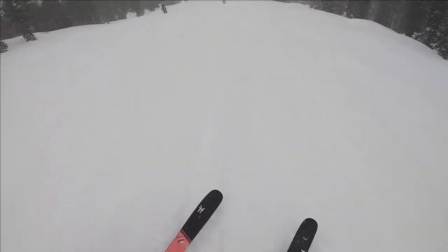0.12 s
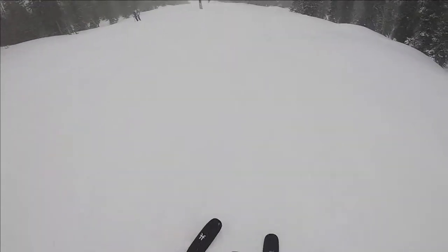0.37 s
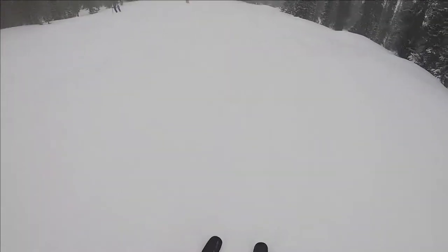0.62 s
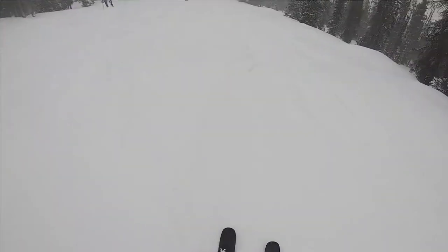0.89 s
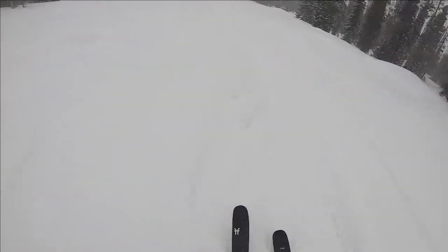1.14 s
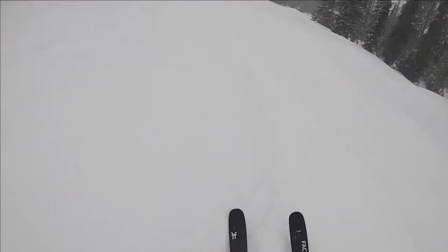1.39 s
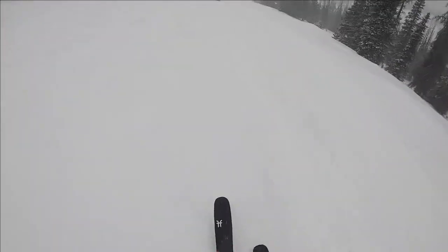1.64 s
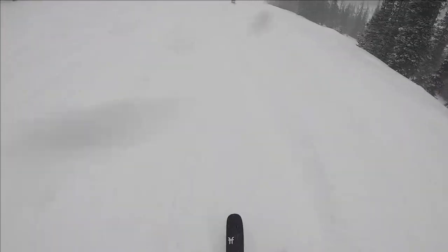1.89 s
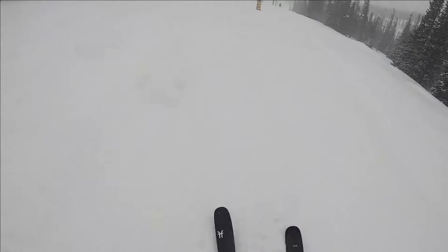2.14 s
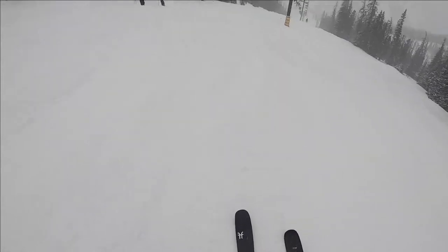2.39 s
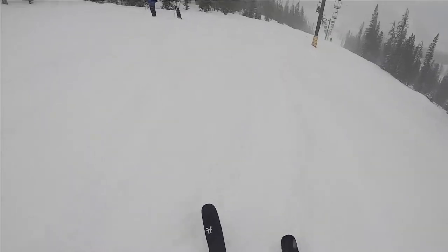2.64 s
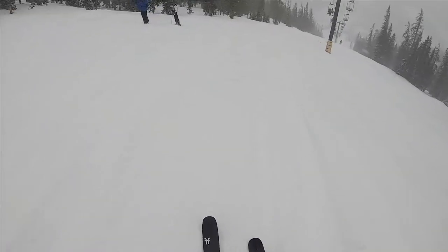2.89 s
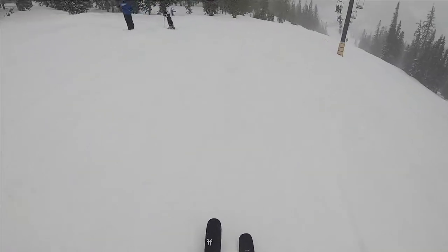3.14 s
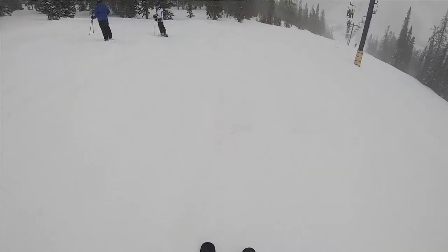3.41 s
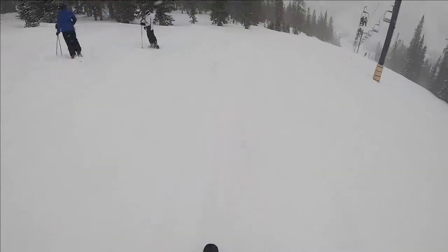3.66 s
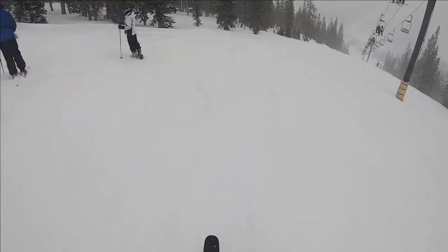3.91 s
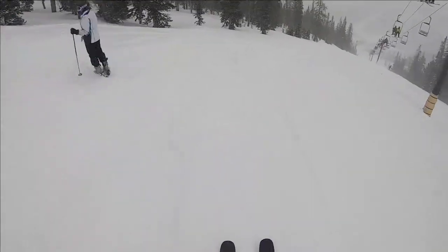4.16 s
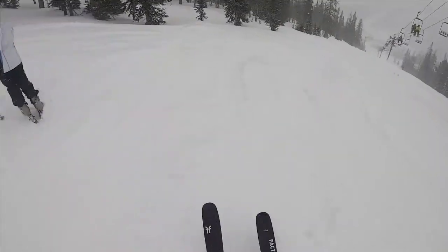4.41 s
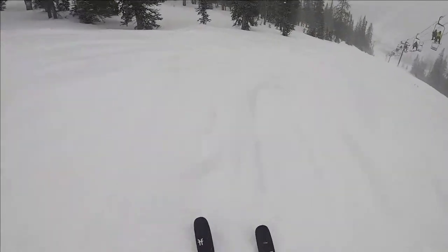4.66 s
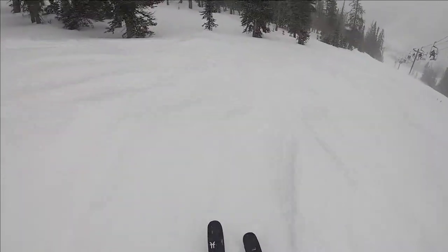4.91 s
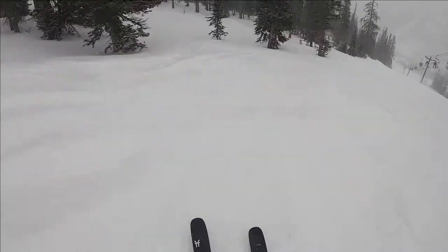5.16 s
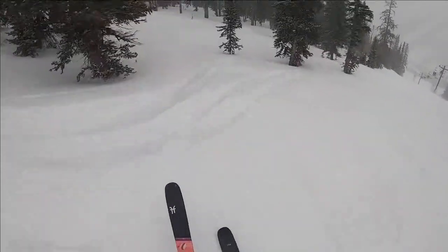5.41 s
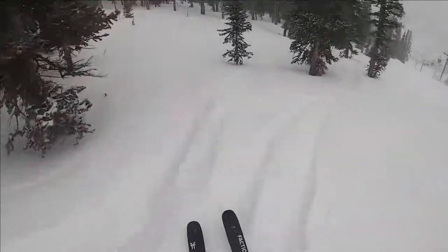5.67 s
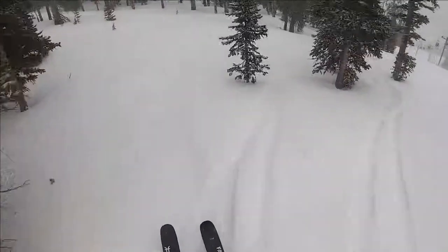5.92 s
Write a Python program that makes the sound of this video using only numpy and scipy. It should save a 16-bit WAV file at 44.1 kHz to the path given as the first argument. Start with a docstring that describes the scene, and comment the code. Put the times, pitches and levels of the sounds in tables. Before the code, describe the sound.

Heavy wind rumbles and buffets a microphone during a fast downhill ski run, with skis hissing over snow and scattered pops, ticks and clacks.

```python
"""A lumpy low rumble, wind rush, howl and ski hiss sound together throughout, with pops and ticks among them:
a small microphone rides downhill above a pair of skis in falling snow.
Shaped noise of fluctuating strength makes the eddies, the air stream past the housing and the snow.
Widening swings make the pressure pops, short noise grains the ticking crystals, decaying modes the gear
clacks, a falling tone the strap's squeak; near the end a side gust flutters and a thin swish rises."""
import sys
import numpy as np
from scipy import signal
from scipy.fft import rfft, irfft, next_fast_len
from scipy.io import wavfile
from scipy.ndimage import uniform_filter1d

SR = 44100
rng = np.random.default_rng(int(sys.argv[2]) if len(sys.argv) > 2 else 0)


def waveform_to_disk(signal):
    """Save audio, clipped to [-1, 1], as 16-bit WAV at the path in sys.argv[1]."""
    frames = np.transpose(np.atleast_2d(signal))
    scaled = np.clip(frames, -1, 1) * 32767
    samples = np.round(scaled).astype(np.int16)
    wavfile.write(sys.argv[1], SR, samples)


def makeup_ratio(level_db):
    """Linear amplitude ratio for a level in decibels (20 dB per factor of ten)."""
    decades = np.asarray(level_db, float) / 20
    return 10 ** decades


N = 266492

# Eddies on the port. Each row: time in seconds, strength in dB, extra depth of the thump in dB.
EDDY_STRENGTH = [(0.0, -15.5, -12), (0.1, -14.5, 2), (0.15, -11, 8), (0.18, -18.5, -3), (0.69, -9, -7.5),
                 (1.01, -14.5, -12), (1.16, -21, -0.5), (1.18, -9, -9), (1.29, -14.5, -6.5),
                 (1.85, -17.5, -3), (1.92, -15, -11.5), (2.62, -11, 0), (2.84, -22, -10.5), (2.88, -14, 2),
                 (2.96, -13.5, -14), (3.08, -13.5, -4), (3.23, -19.5, -7.5), (3.31, -13.5, -8),
                 (3.95, -14, -3), (4.0, -11, -8), (4.14, -11, -2.5), (4.27, -23.5, -3), (4.31, -13.5, -3.5),
                 (5.0, -20.5, -5.5), (5.03, -11, -9.5), (5.4, -20, 6), (5.5, -13, -17), (5.75, -19.5, -11),
                 (5.79, -2.5, -2), (5.96, -28, -1), (6.01, -5.5, -24), (6.04, -21, 1)]
# Noise spectra of the eddies. Each row: frequency in Hz, relative spectral density in dB.
THUMP_SPECTRUM = [(16, 1.5), (25, -7.5), (45, 1.5), (62, -8.5), (90, -9.5), (150, -61)]
RUMBLE_SPECTRUM = [(40, -11), (62, -3.5), (80, -2), (125, -3.5), (170, -10.5), (250, -20.5), (400, -39),
                   (800, -69)]
# Air stream past the housing. Each row: time in seconds, strength in dB,
# how squarely it meets the howling edge in dB.
AIR_STREAM = [(0.0, -32, -0.5), (0.1, -25.5, -13), (0.16, -32, -16), (0.19, -41, -28), (0.38, -32, -15),
              (0.47, -35, 0), (0.54, -30, 2.5), (0.62, -27.5, -3), (0.73, -23.5, -2.5), (0.85, -26.5, -3.5),
              (0.94, -30.5, 4), (1.02, -25, 1), (1.14, -34.5, 3), (1.25, -25, 3.5), (1.42, -30, -5),
              (1.57, -29.5, 3), (1.68, -30.5, -2), (1.8, -30, 1.5), (2.03, -26.5, -2), (2.1, -19.5, -5),
              (2.2, -30.5, 1.5), (2.44, -25.5, -4), (2.83, -36.5, -10), (2.9, -30, -1), (3.0, -34, -10),
              (3.08, -40, -53), (3.44, -34, -6), (3.52, -31, -1), (3.94, -32, -8.5), (4.15, -28.5, 4),
              (4.19, -34, -2), (4.3, -34, -1), (4.42, -32.5, -2.5), (4.52, -31.5, 0.5), (4.63, -30, 1.5),
              (4.76, -31, -2), (4.95, -29, -4.5), (5.1, -29, -13), (5.15, -30, -22), (5.4, -31, -16),
              (5.48, -30, -19), (5.5, -27, -27), (5.58, -38, -30), (5.595, -25, -10), (5.61, -23, -35),
              (5.72, -27.5, 2), (5.81, -24, -3), (5.89, -21.5, -8), (5.95, -26.5, -15), (6.04, -23.5, -22)]
# Noise spectrum of the rushing air. Each row: frequency in Hz, relative spectral density in dB.
RUSH_SPECTRUM = [(120, -13), (200, 3), (300, -2), (450, -6), (700, -7.5), (1000, -11), (1600, -18.5),
                 (2400, -29.5), (4000, -38)]
# Pitch of the howl as the head turns. Each row: time in seconds, frequency in Hz.
HOWL_PITCH_HZ = [(0, 1059), (0.5, 1325), (0.7, 1245), (0.95, 1216), (1.3, 1428), (1.55, 1314), (1.65, 1453),
                 (1.8, 1223), (2.1, 1356), (2.4, 1212), (2.7, 1333), (3.6, 1077), (4.0, 1197),
                 (4.14, 979.7), (4.4, 1067), (4.7, 1198), (5.2, 1065), (5.47, 1210), (5.8, 1022)]
# Skis on the snow. Each row: time in seconds, pressure as scrape level in dB,
# fineness of the snow thrown up in dB.
SKI_PRESSURE = [(0.0, -43, -7), (0.34, -47.5, 3.5), (0.67, -32.5, -12.5), (1.01, -36.5, -11),
                (1.06, -32, -1.5), (1.18, -37.5, -2.5), (1.35, -34.5, -7.5), (1.63, -41.5, -1),
                (1.95, -37.5, -4), (2.15, -34, -6), (2.25, -39.5, -14), (2.47, -36, -3.5),
                (2.71, -41.5, -0.5), (2.84, -44, -4), (3.04, -45, 0), (3.08, -53, 1.5), (3.26, -50.5, 5.5),
                (3.53, -35, -8), (3.57, -42, -8.5), (3.85, -42, 0), (4.09, -35, -2.5), (4.41, -43.5, -2.5),
                (4.55, -35, -7.5), (4.67, -38, -6), (4.8, -41.5, -8.5), (5.0, -40, -6), (5.23, -43.5, -4),
                (5.47, -35, -12), (5.62, -41.5, -5), (5.68, -30, -8.5), (6.04, -47, -2)]
# Noise spectra of the snow. Each row: frequency in Hz, relative spectral density in dB.
SCRAPE_SPECTRUM = [(900, -34), (1500, 4), (2000, 6), (3100, 3), (3700, -12), (5000, -51)]
HISS_SPECTRUM = [(2200, -20), (3300, 3), (4000, 1.5), (5000, -3), (5800, -17.5), (8000, -41)]
SPRAY_SPECTRUM = [(4000, -3), (5600, -1), (7500, -1.5), (9800, -8.5), (11500, -17), (14000, -40),
                  (16000, -65)]
# Puffs of powder past the microphone, and gaps in it.
# Each row: middle in seconds, length in seconds, level change in dB.
POWDER_PUFFS = [(0.01, 0.19, 6.5), (0.34, 0.16, 4.5), (0.56, 0.17, 4), (1.257, 0.29, 6), (1.687, 0.36, 4.5),
                (2.078, 0.44, 7.5), (2.275, 0.16, 5.5), (2.4, 0.08, 3.5), (2.56, 0.11, 1),
                (2.824, 0.17, -5), (2.92, 0.13, 7), (3.433, 0.22, 2), (3.74, 0.069, 4), (4.43, 0.099, -5),
                (5.792, 0.036, 5), (5.788, 0.99, -5)]
# Pressure steps on the membrane. Each row: deepest point in seconds, strength in dB, time scale in ms
# (the first swing lasts 1.1 times that).
PRESSURE_POPS = [(0.0163, -17, 0.42), (0.1698, -13, 0.84), (0.4077, -11.5, 0.11), (0.564, -9, 0.27),
                 (0.6554, -12.5, 0.28), (0.7194, -13, 0.21), (0.7285, -7, 0.2), (0.967, -10.5, 0.3),
                 (1.2608, -6.5, 0.19), (1.3882, 2, 0.19), (1.978, -10, 0.23), (2.0671, -8.5, 0.28),
                 (2.0842, -10, 0.17), (2.3493, -10.5, 0.19), (2.3524, -12, 0.16), (2.6154, -14, 0.18),
                 (2.688, -6, 1.47), (2.7774, -11.5, 0.19), (2.9554, -14, 0.35), (2.9835, -17, 0.24),
                 (3.041, -13, 0.68), (3.113, -15, 1.03), (3.201, -18.5, 0.46), (3.239, -20, 0.5),
                 (3.3187, -9.5, 0.33), (3.4196, -4.5, 0.36), (3.445, -21, 0.3), (3.695, -15, 0.4),
                 (3.811, -22, 0.19), (3.8856, -10.5, 0.25), (3.9705, -0.5, 0.36), (4.07, -12.5, 0.5),
                 (4.7152, -13.5, 0.41), (4.8375, -16, 0.22), (5.041, -6, 2.5), (5.090, -7, 1.16),
                 (5.499, -6.5, 0.93), (5.5249, -10, 0.76), (5.562, -6, 1.9), (5.6058, -5.5, 0.48),
                 (5.611, -3, 0.62), (5.645, -4.5, 0.65), (5.666, -2.5, 0.61), (5.7835, -21, 0.5),
                 (5.887, -3.5, 0.48), (5.910, -10, 0.7), (6.005, -6, 0.6)]
# Small eddies popping at random. Each row: start in seconds, end in seconds,
# greatest strength over the buffet's in dB, shortest time scale in ms.
RIPPLE_SPANS = [(0, 6.04, -7.5, 0.49), (5.601, 6.04, -4.5, 0.3)]
# Each entry: number of small eddies in the span of the same place.
RIPPLE_NUMBERS = [110, 30]
# Loudest crystals on the case. Each row: time in seconds, strength in dB,
# dullness in dB (above 0 a bigger, lower grain).
LOUD_CRYSTALS = [(0.0567, -28, -6), (0.1444, -49.5, 13), (0.2483, -46, 3), (0.3047, -41, -4),
                 (0.318, -44, 6.5), (0.3614, -43, 2), (0.56, -39, -18), (0.617, -37, -18),
                 (0.801, -32, -13), (0.837, -34, -8), (0.959, -37, -15), (1.228, -22.5, -3.5),
                 (1.3076, -24, -3.5), (1.353, -30, 4.5), (1.449, -27.5, -11), (2.019, -40, 3),
                 (2.1194, -29, -5), (2.187, -32.5, 8), (2.3191, -40, 6), (2.4823, -39, -3),
                 (3.037, -38, 6.5), (3.1836, -41, -16), (3.2064, -26.5, -3), (3.485, -37, 0),
                 (3.527, -42, 6.5), (3.606, -38, 3.5), (3.654, -28.5, 0), (4.009, -38, 4.5),
                 (4.171, -47, 14), (4.352, -33.5, 4.5), (4.599, -36, -10), (4.7256, -47.5, 12),
                 (4.792, -31.5, -9), (4.89, -37, 3), (4.9425, -31.5, 4), (5.027, -39, -16),
                 (5.091, -30, -13), (5.2641, -31, 4.5), (5.3342, -27, -4.5), (5.744, -48, -10),
                 (5.7753, -39, -2), (5.8626, -36.5, 3)]
# Bands of a crystal's tick. Each row: low edge in Hz, high edge in Hz, sensitivity of the port in dB,
# share of the dullness.
CRYSTAL_BANDS = [(5700, 8000, -4.5, -0.39), (3300, 5400, 7, 1.46), (9400, 10430, -22, -1.25),
                 (11100, 13500, -33, -1.3)]
# Gear clacks. Each row: start in seconds, ring level in dB, ring frequency in Hz, crack peak in dB,
# cycles in which the ring dies by 60 dB.
GEAR_CLACKS = [(0.1083, -15, 1340, -38, 22), (0.4066, -4, 1670, -16, 8), (1.305, -20, 1520, -29, 30),
               (1.351, -14, 1300, -19, 37), (1.439, -28, 1187, -18, 30), (1.81, -21, 1210, -46, 32),
               (1.893, -16, 1273, -48, 40), (2.1832, -11, 1440, -17, 30), (2.4, -10, 1100, -23, 25),
               (2.4183, -12, 1170, -20, 27), (2.5302, -22.5, 1976, -43, 50), (2.681, -19.5, 1434, -22, 25),
               (3.039, -22.5, 1710, -19, 30), (3.21, -16, 1590, -28, 22), (3.8075, -17, 960, -36, 25),
               (3.884, -9.5, 2040, -34, 19), (3.887, -19, 900, -43, 22), (4.088, -16, 1250, -35, 28),
               (4.219, -17, 1170, -42, 35), (4.354, -22, 1460, -19, 32), (4.665, -10.5, 1013, -24, 28),
               (4.937, -18, 857, -25.5, 25), (4.98, -21, 996, -40, 32), (5.265, -23, 808, -19.5, 30),
               (5.521, -24, 690, -26, 30), (5.555, -25, 1670, -45, 40), (5.785, -11, 1540, -24, 31),
               (5.795, -11, 1370, -22, 26), (5.9525, -14.5, 1724, -26, 22), (5.998, -20, 1576, -40, 30),
               (6.015, -11, 1383, -30, 30)]
# Noise spectra of the side gust. Each row: frequency in Hz, relative spectral density in dB.
FLUTTER_SPECTRUM = [(70, -18), (110, 0.5), (180, -2), (300, -6), (480, -16.5), (800, -29)]
GRIT_SPECTRUM = [(300, -17), (500, 3.5), (900, -5), (1500, -11), (2300, -16), (3500, -43)]

# the side gust strikes twice, rising alike each time
SIDE_GUST_S, SIDE_SECOND_S, SIDE_RISE_S = 5.49, 5.6, 0.009


def rms_one(x):
    """Normalisation: a signal divided by its root mean square has unit power."""
    return x / np.sqrt(np.mean(x ** 2) + 1e-20)


def in_time(rows):
    """Linear interpolation: each column of a time table becomes one value per sample."""
    s, *columns = np.transpose(rows)
    return [np.interp(np.arange(N) / SR, s, c) for c in columns]


def drift(rate_hz):
    """Low-pass filtering: noise through two equal one-pole filters wanders slowly with unit rms."""
    step = 20   # samples between computed points
    r = np.exp(-2 * np.pi * rate_hz * step / SR)
    noise = rng.standard_normal(N // step + 2002)
    slow = signal.lfilter([1], [1, -2 * r, r * r], noise)[2000:]   # the filter has settled
    return np.interp(np.arange(N) / step, np.arange(len(slow)), rms_one(slow))


def coloured(spectrum, x):
    """Spectral shaping: the Fourier components are weighted by a curve over log frequency; rms 1."""
    size = next_fast_len(N)
    hz, db = np.transpose(spectrum)
    log_hz = np.log(np.arange(1, size // 2 + 2) * SR / size)
    weight = makeup_ratio(np.interp(log_hz, np.log(hz), db, left=-99, right=-99))
    return rms_one(irfft(rfft(x, size) * weight, size)[:N])


def turbulence(flicker_db, flicker_hz, grit_db):
    """Intermittency: white noise whose strength flickers slowly with eddies and fast from grain to grain."""
    return rng.standard_normal(N) * makeup_ratio(flicker_db * drift(flicker_hz) + grit_db * drift(234))


def evened(x, span_s, share):
    """Regular succession of eddies: part of the random swell is divided out; rms 1."""
    swell = np.sqrt(uniform_filter1d(x ** 2, round(span_s * SR)) + 1e-3)
    return rms_one(x / swell ** share)


def add(out, s, burst):
    """Superposition: a short burst adds to the sound from time s on."""
    at = round(s * SR)
    out[at:at + len(burst)] += burst[:N - at]


def band_bursts(grains, low_hz, high_hz, order=2):
    """Band-pass filtering: rows of decaying noise keep one band, each scaled to peak 1."""
    band = signal.butter(order, [low_hz, high_hz], "band", fs=SR, output="sos")
    bursts = signal.sosfilt(band, grains)
    return bursts / np.abs(bursts).max(axis=1, keepdims=True)


def crunch(per_s, size_db, fade_s):
    """Impulsive excitation: clods and sharp eddies jolt the level at random; it relaxes exponentially, in dB."""
    jumps = (rng.random(N) < per_s / SR) * np.minimum(rng.exponential(1, N), 2.5)
    return size_db * signal.lfilter([1], [1, -np.exp(-1 / (fade_s * SR))], jumps)


def puffs():
    """Smooth modulation: each puff or gap swells and fades as a squared cosine, in dB."""
    t = np.arange(N) / SR
    return sum(db * np.cos(np.pi * np.clip((t - s) / length, -0.5, 0.5)) ** 2
               for s, length, db in POWDER_PUFFS)


def buffeting(rumble):
    """Turbulent pressure: large eddies thump and smaller ones rumble at the port, taking turns."""
    eddy_db, deep_db = in_time(EDDY_STRENGTH)
    swap_db = 4 * drift(12)
    lump_db = 1.1 * drift(6.9)   # single buffets stand out
    # the side gust breaks up the largest eddies
    broken_db = -15 * np.clip((np.arange(N) / SR - SIDE_GUST_S) / SIDE_RISE_S, 0, 1)
    thump = evened(coloured(THUMP_SPECTRUM, rng.standard_normal(N)), span_s=0.42, share=0.27)
    thump = makeup_ratio(broken_db + deep_db + swap_db) * thump
    rumble = makeup_ratio(-3.5 - 0.28 * deep_db - 0.43 * swap_db) * rumble
    return makeup_ratio(eddy_db + lump_db) * (thump + rumble)


def howl(centre_hz, width_hz, gust):
    """Edge tone: low-passed noise on a quadrature carrier is a narrow band at a moving, wavering pitch."""
    low_pass = signal.butter(2, width_hz / 2, fs=SR, output="sos")
    slow = [signal.sosfilt(low_pass, turbulence(0.29, 30, 3.1) * gust) for side in range(2)]
    wander = 0.05 * drift(12)   # share of the pitch
    phase = 2 * np.pi * np.cumsum(centre_hz * (1 + wander)) / SR
    return rms_one(slow[0] * np.cos(phase) + slow[1] * np.sin(phase))


def air_stream(gust_db, rumble):
    """Flow noise: the stream rushes past the housing, stronger in each rumble swing, and howls at its edge."""
    air_db, edge_db = in_time(AIR_STREAM)
    howl_hz, = in_time(HOWL_PITCH_HZ)
    swing = 1.2 + uniform_filter1d(np.abs(rumble), size=600)
    rush = coloured(RUSH_SPECTRUM, turbulence(1.37, 28, 3.3) * makeup_ratio(1.2 * gust_db) * swing)
    edge_howl = howl(howl_hz, width_hz=420, gust=makeup_ratio(2.0 * gust_db))
    return makeup_ratio(air_db) * (makeup_ratio(1.5) * rush + makeup_ratio(-1.5 + edge_db) * edge_howl)


def skis_on_snow(gust_db):
    """Friction noise: pressed snow scrapes and hisses, and fine spray adds the highest band."""
    scrape_db, fine_db = in_time(SKI_PRESSURE)
    puff_db = puffs()
    scrape = coloured(SCRAPE_SPECTRUM, turbulence(1.97, 27, 1.8) * makeup_ratio(1.6 * gust_db))
    hiss = coloured(HISS_SPECTRUM, turbulence(2.06, 19, 0.75) * makeup_ratio(1.1 * gust_db))
    spray = coloured(SPRAY_SPECTRUM, turbulence(0.57, 35, 1.34) * makeup_ratio(2.2 * gust_db))
    # the spray follows only a share of the pressure's swing about -41 dB
    spray_db = -53 + 0.29 * (scrape_db + 41) + 0.044 * fine_db + puff_db
    lower_snow = makeup_ratio(0.88 * puff_db) * scrape + makeup_ratio(fine_db + 0.6 * puff_db) * hiss
    return makeup_ratio(scrape_db) * lower_snow + makeup_ratio(spray_db) * spray


def wind_and_skis():
    """Common modulation: the same quick gusts shake the air stream and the snow over the eddies."""
    gust_db = 0.3 * drift(29) + crunch(per_s=40, size_db=1.1, fade_s=0.016)
    rumble = evened(coloured(RUMBLE_SPECTRUM, rng.standard_normal(N)), span_s=0.3, share=0.28)
    return buffeting(rumble) + air_stream(gust_db, rumble) + skis_on_snow(gust_db)


def random_pops():
    """Random arrivals: eddies sweep by at chance moments with chance strengths and time scales."""
    eddy_db, deep_db = in_time(EDDY_STRENGTH)
    sweeps = []
    for a, b, c in rng.random((70, 3)):   # large eddies, slow
        sweeps.append((a * N / SR, eddy_db[int(a * N)] + 5 - 7.5 * b, 1.48 * (1 + 2.06 * c)))
    for (start, end, db, shortest_ms), count in zip(RIPPLE_SPANS, RIPPLE_NUMBERS):
        for a, b, c in rng.random((count, 3)):
            s = min(start + a * (end - start), (N - 1) / SR)
            sweeps.append((s, eddy_db[int(s * SR)] + db - 9.3 * b, shortest_ms * (1 + 2.07 * c)))
    return sweeps


def pops():
    """Step response: after a pressure step the membrane swings to and fro, each swing 2.1 times longer."""
    out, ms = np.zeros(N), np.arange(4000) * 1000 / SR
    port = signal.butter(8, 2450, fs=SR, output="sos")   # the port rounds the step
    for s, db, swing_ms in list(PRESSURE_POPS) + random_pops():
        swings = np.log(1 + ms / swing_ms) / np.log(2.1)
        size = np.where(swings < 1, 0.97, 1) * np.exp(-(swings / 3.23) ** 4)   # first swing held back slightly
        # a slower pop has a duller edge
        soft = signal.butter(2, min(0.53 * 1000 / swing_ms, 9000), fs=SR, output="sos")
        step = makeup_ratio(db) * np.sin(np.pi * swings) * size + 1e-18
        pop = signal.sosfilt(np.vstack([soft, port]), step)
        add(out, max(s - pop.argmin() / SR, 0), pop)   # s marks the deepest point
    return out


def crystals(per_s, faint_db):
    """Impact noise: each crystal is a millisecond of bright noise; faint ones arrive at random."""
    faint = [(a * N / SR, faint_db - 12 * b, 3 - 24 * c) for a, b, c in rng.random((round(per_s * N / SR), 3))]
    rows = np.array(list(LOUD_CRYSTALS) + faint)
    out, t = np.zeros(N), np.arange(200) / SR
    grains = rng.standard_normal((len(rows), len(t))) * t * np.exp(-t / 0.0004)
    own_db = 3.77 * rng.standard_normal((len(rows), len(CRYSTAL_BANDS)))   # no two sound alike
    ticks = np.zeros(grains.shape)
    for k, (low_hz, high_hz, db, share) in enumerate(CRYSTAL_BANDS):
        level_db = rows[:, [1]] + db + share * rows[:, [2]] + own_db[:, [k]]
        ticks += makeup_ratio(level_db) * band_bursts(grains, low_hz, high_hz)
    for s, tick in zip(rows[:, 0], ticks):
        add(out, s, tick)
    return out


def squeak():
    """Stick-slip: a strap slips twice, its tone falling quickly to a steady pitch."""
    start_s, length_s = 0.1075, 0.018
    first_hz, settled_hz, settle_s = 1390, 900, 0.0015
    out, t = np.zeros(N), np.arange(round(length_s * SR)) / SR
    hz = settled_hz + (first_hz - settled_hz) * np.exp(-t / settle_s)
    part = t / length_s
    dip_db = -11 * np.exp(-((part - 0.45) / 0.097) ** 2)   # between the two slips
    level = np.sin(np.pi * part) ** 0.3 * makeup_ratio(-14 - 4.9 * part + dip_db)
    add(out, start_s, level * np.sin(2 * np.pi * np.cumsum(hz) / SR))
    return out


def clacks():
    """Modal ringing: knocked buckles and poles ring in two damped modes with a band of cracking noise."""
    out, t = np.zeros(N), np.arange(2000) / SR
    # a longer ring comes with a longer crack
    crack_s = np.array([[1.8 * cycles / hz] for s, db, hz, crack_db, cycles in GEAR_CLACKS])
    noise = rng.standard_normal((len(GEAR_CLACKS), len(t))) * makeup_ratio(-60 * t / crack_s)
    cracks = band_bursts(noise, 1350, 3720, order=4)
    for (s, db, hz, crack_db, cycles), crack in zip(GEAR_CLACKS, cracks):
        upper = 0.7 * np.sin(2 * np.pi * 1.433 * hz * t) * makeup_ratio(-60 * t / 0.025)
        ring = (np.sin(2 * np.pi * hz * t) + upper) * np.minimum(t / 0.001, 1)
        add(out, s, makeup_ratio(db - 60 * t * hz / cycles) * ring + makeup_ratio(crack_db) * crack)
    return out


def side_gust():
    """Turbulent onset: fast small eddies set in abruptly, twice, and flutter at the port in uneven lumps."""
    t = np.arange(N) / SR - SIDE_GUST_S
    second_s = SIDE_SECOND_S - SIDE_GUST_S
    lull_db = np.interp(t, [0.04, second_s, second_s + SIDE_RISE_S], [0, -12, 0])
    level = np.clip(t / SIDE_RISE_S, 0, 1) * makeup_ratio(-14 - 12.5 * t + lull_db)   # sags by 12.5 dB per s
    second = np.clip((t - second_s) / SIDE_RISE_S, 0, 1)
    flutter = coloured(FLUTTER_SPECTRUM, turbulence(4.1, 19.5, 1.48))
    grit = makeup_ratio(-12) * second * coloured(GRIT_SPECTRUM, turbulence(2.5, 45, 3.0))
    return level * (flutter + grit)


def swish():
    """Gliding resonance: a narrow band of air noise climbs in pitch past the housing, swells and fades."""
    start_s, length_s, from_hz, to_hz = 5.62, 0.15, 2200, 4400
    part = np.clip((np.arange(N) / SR - start_s) / length_s, 0, 1)
    centre_hz = from_hz + (to_hz - from_hz) * part
    return makeup_ratio(-37.5) * np.sin(np.pi * part) * howl(centre_hz, width_hz=600, gust=1)


def scene():
    """Superposition: all sources add at one microphone in open air."""
    mix = wind_and_skis() + pops() + crystals(per_s=25, faint_db=-40.0) + squeak() + clacks()
    mix = mix + side_gust() + swish()
    return mix[None]


def top_cut(x):
    """Nothing passes above the cut-off."""
    return signal.sosfilt(signal.butter(12, 15600, fs=SR, output="sos"), x)


def record(dry):
    """Band limiting and saturation: treble and deepest bass roll off, and the highest swings are rounded."""
    dull = signal.sosfilt(signal.butter(4, 12500, fs=SR, output="sos"), dry)
    dull = signal.sosfilt(signal.butter(1, 8, "high", fs=SR, output="sos"), dull)
    limited = np.clip(1.61 * np.tanh(dull / 1.66), -1, 1)
    return top_cut(limited)


dry = scene()
out = record(dry)
waveform_to_disk(out)
```